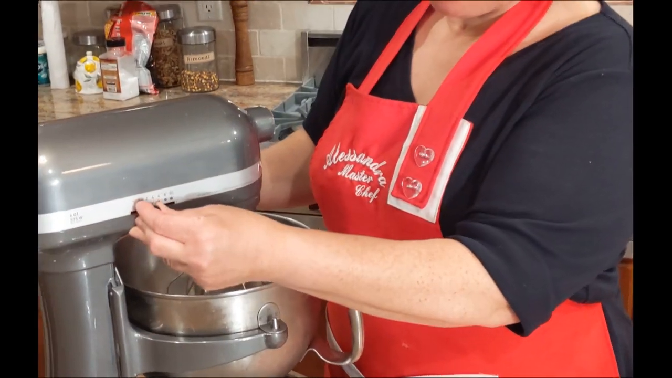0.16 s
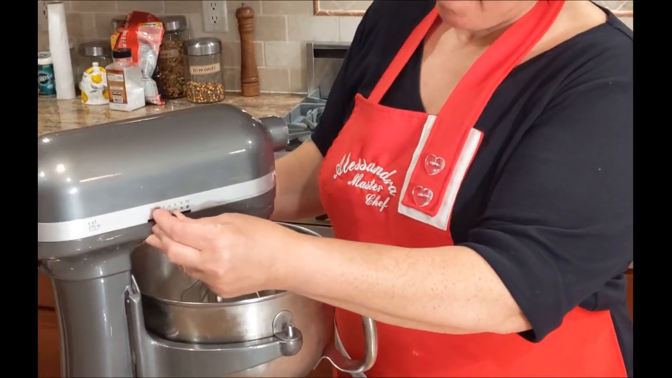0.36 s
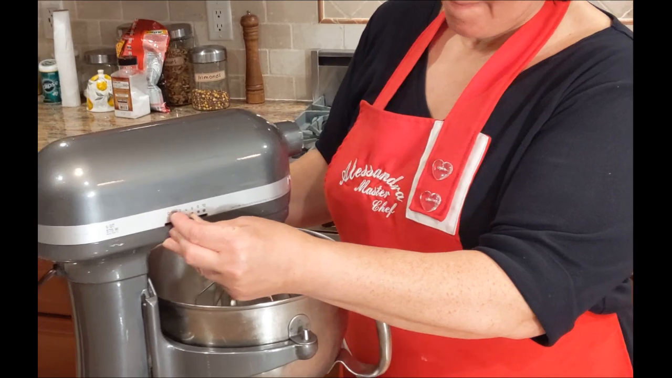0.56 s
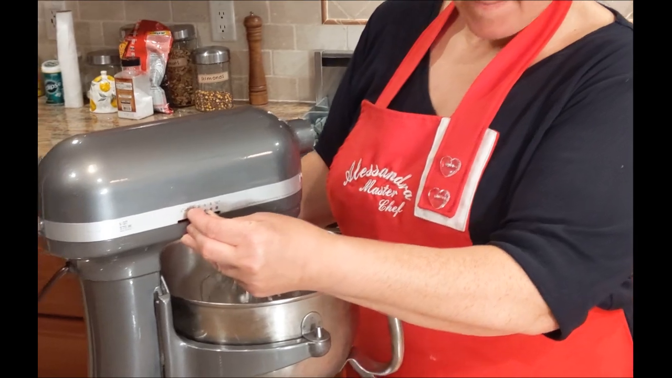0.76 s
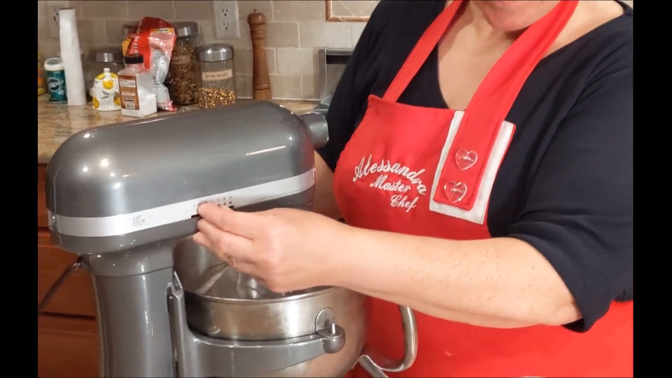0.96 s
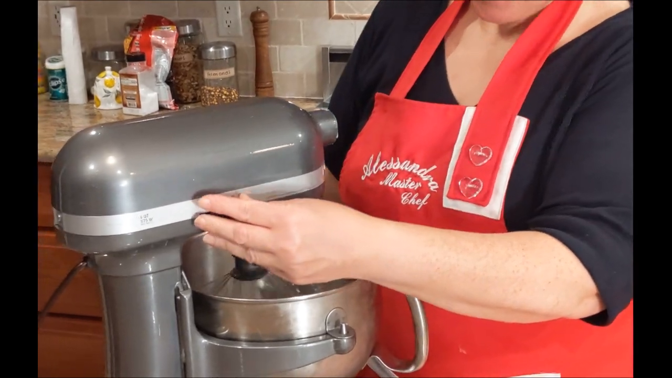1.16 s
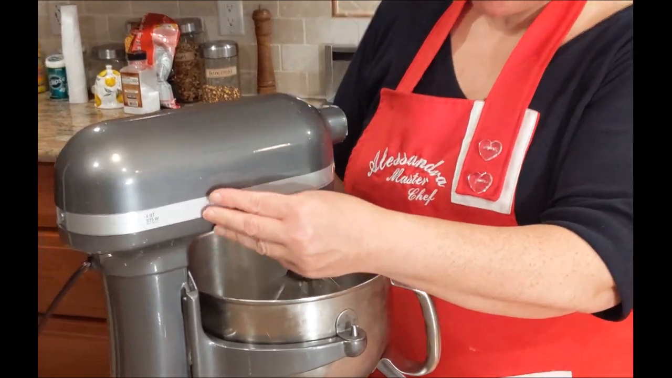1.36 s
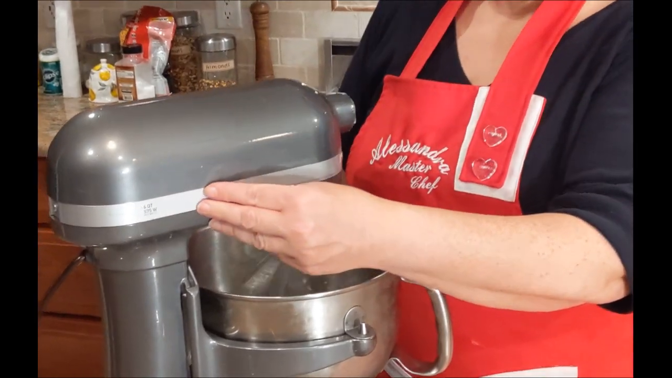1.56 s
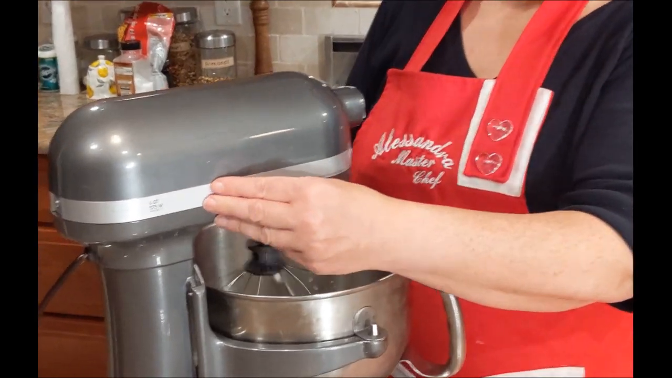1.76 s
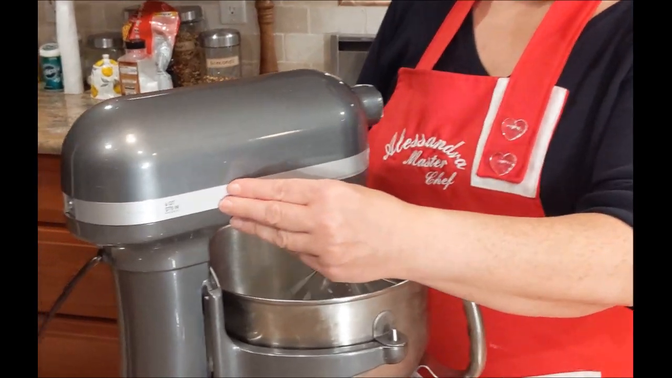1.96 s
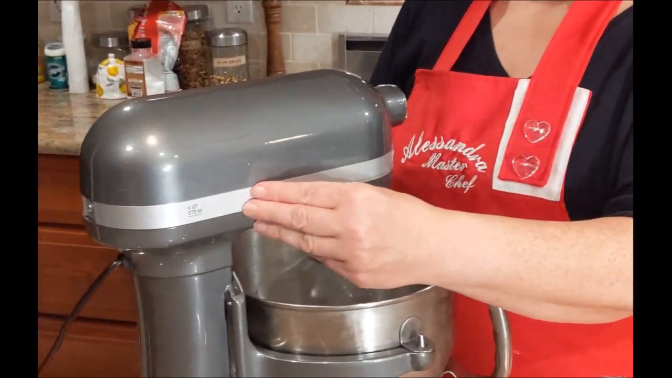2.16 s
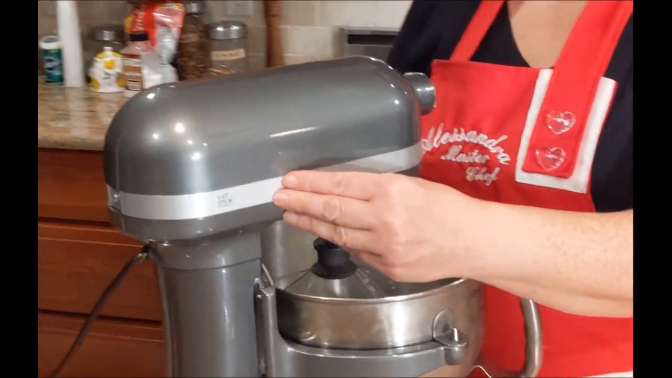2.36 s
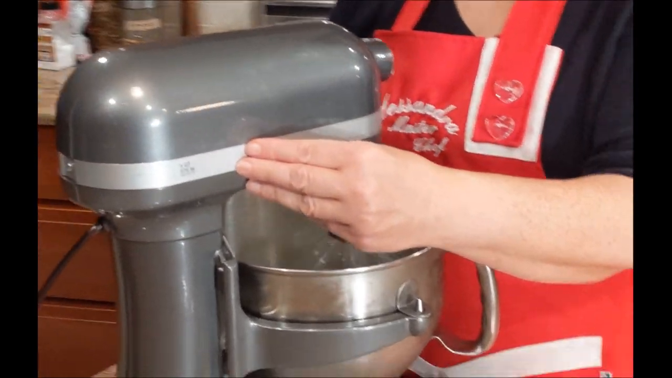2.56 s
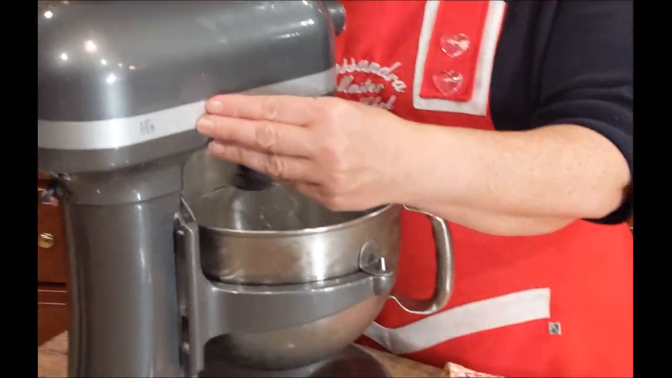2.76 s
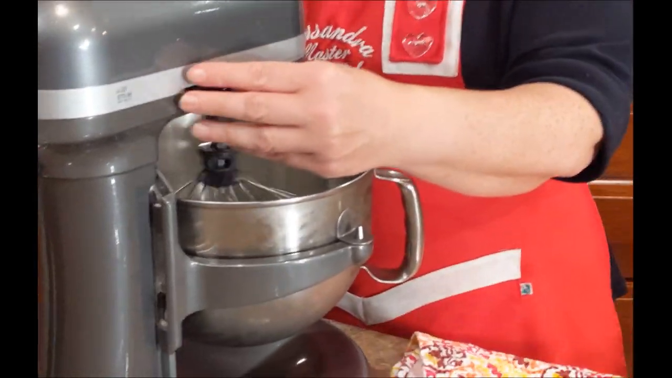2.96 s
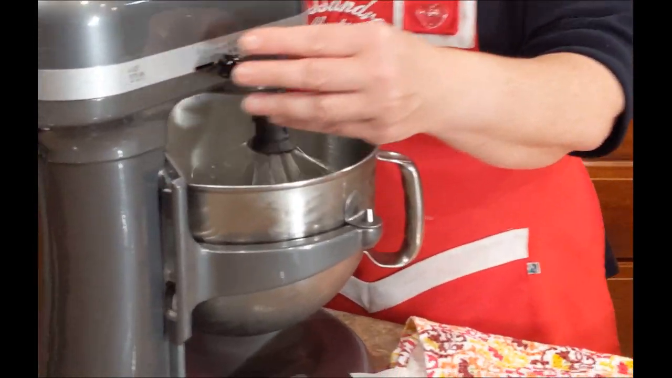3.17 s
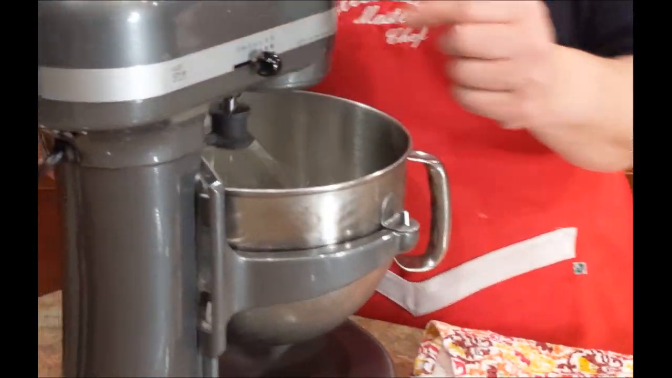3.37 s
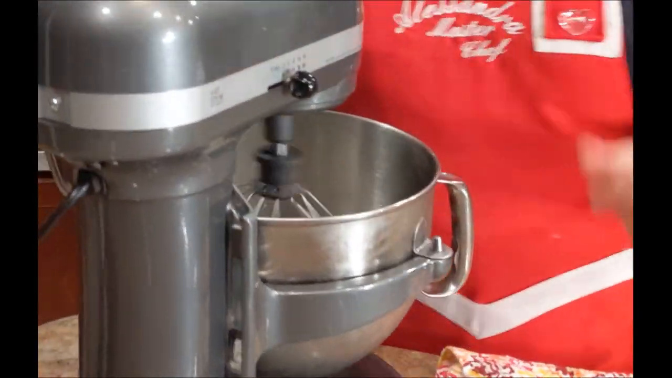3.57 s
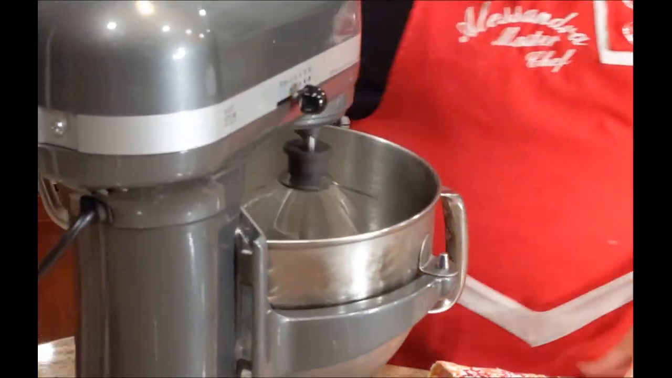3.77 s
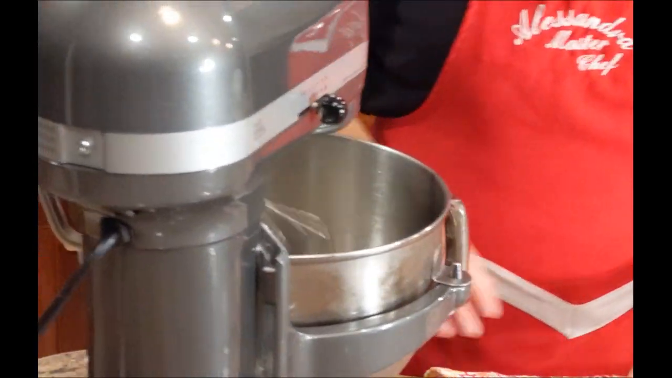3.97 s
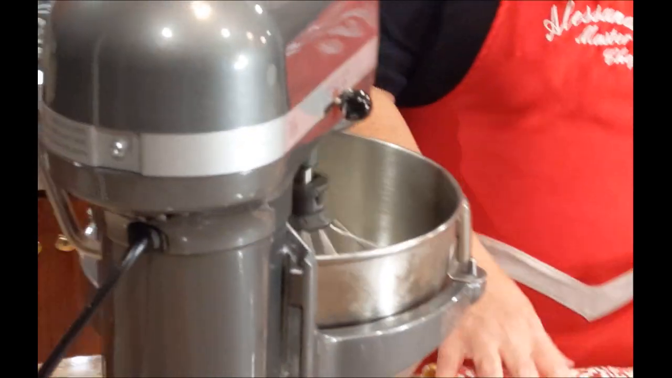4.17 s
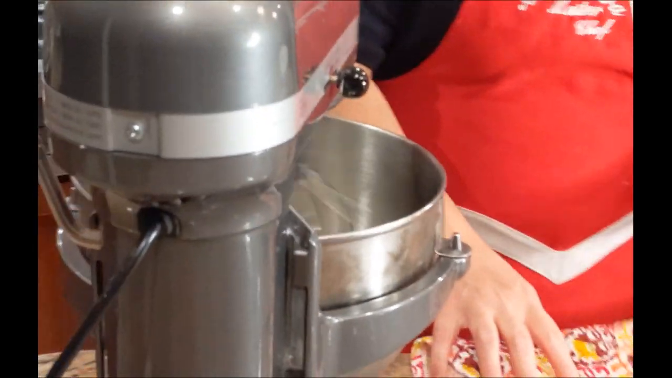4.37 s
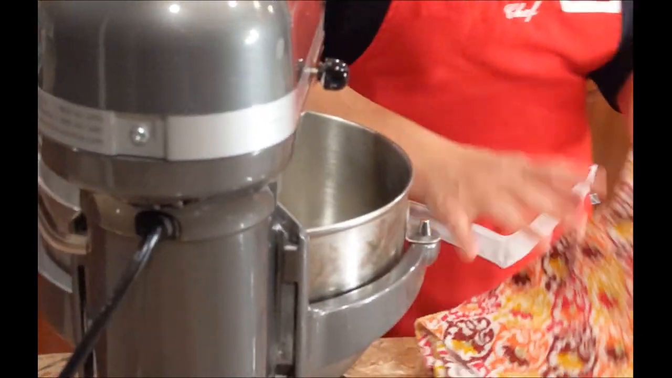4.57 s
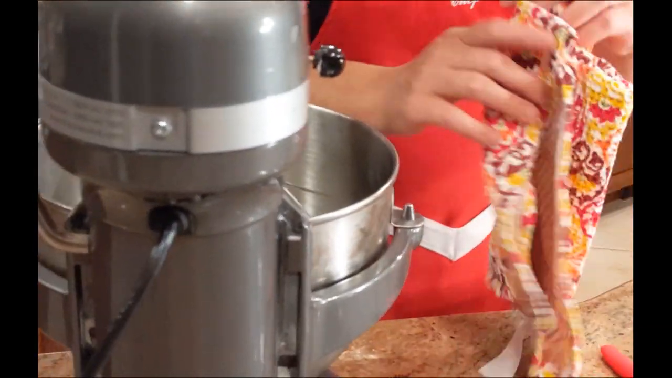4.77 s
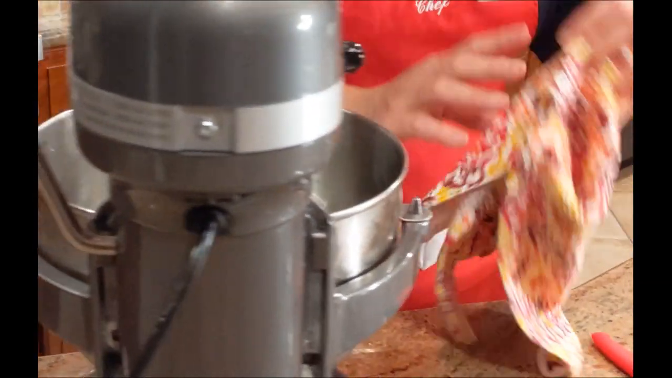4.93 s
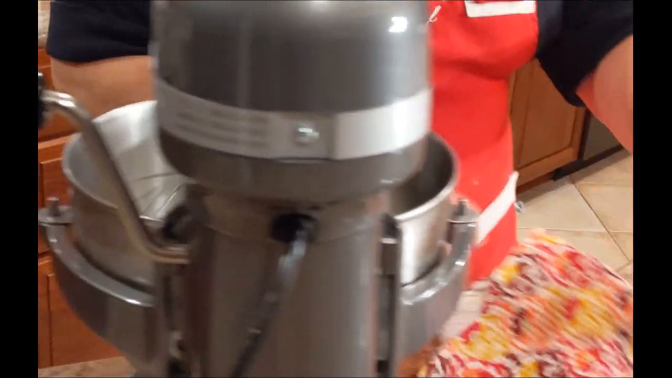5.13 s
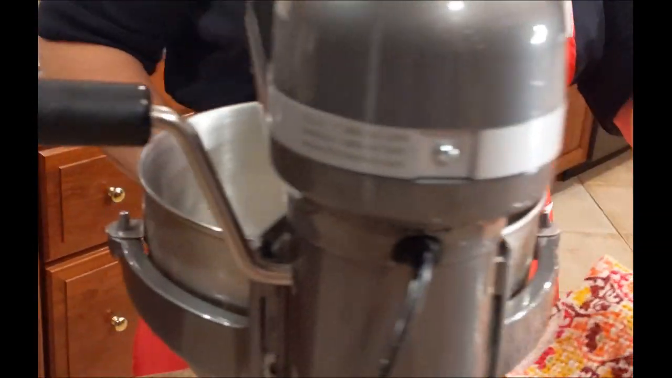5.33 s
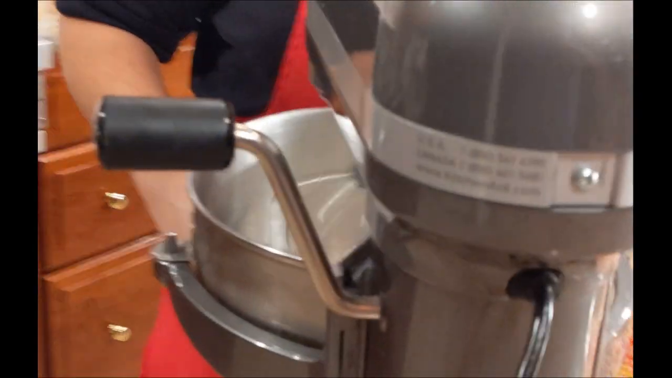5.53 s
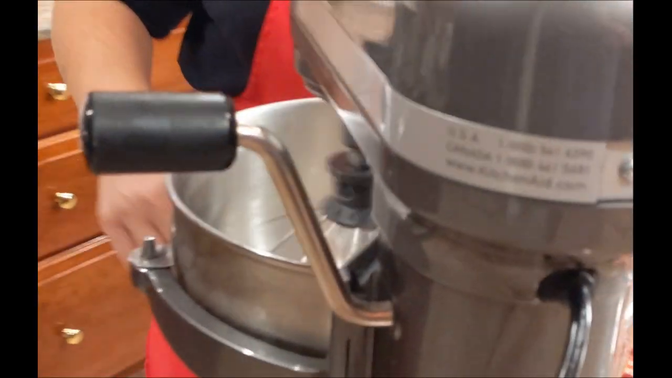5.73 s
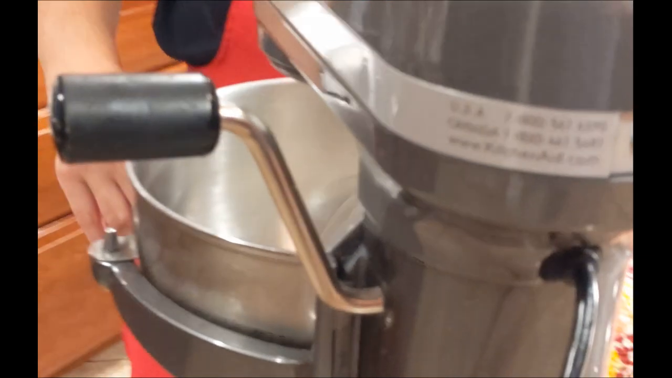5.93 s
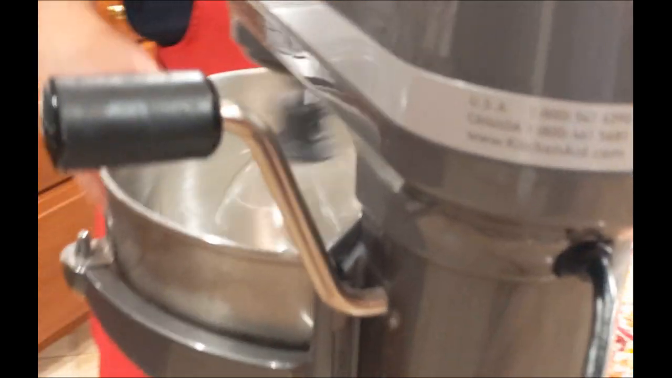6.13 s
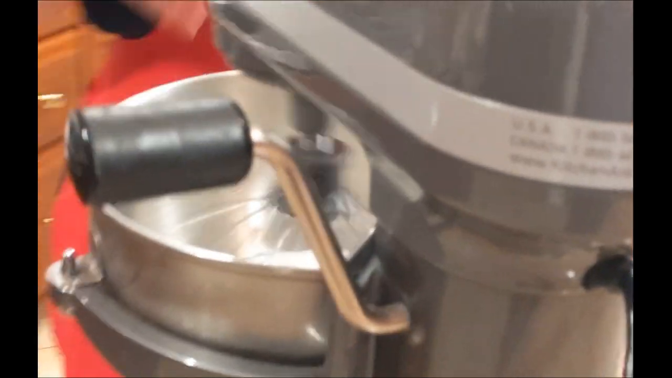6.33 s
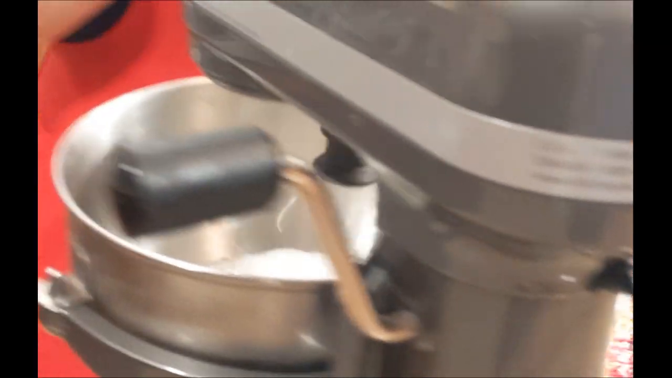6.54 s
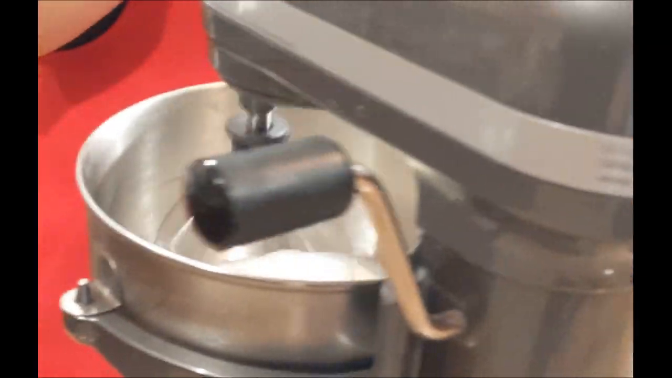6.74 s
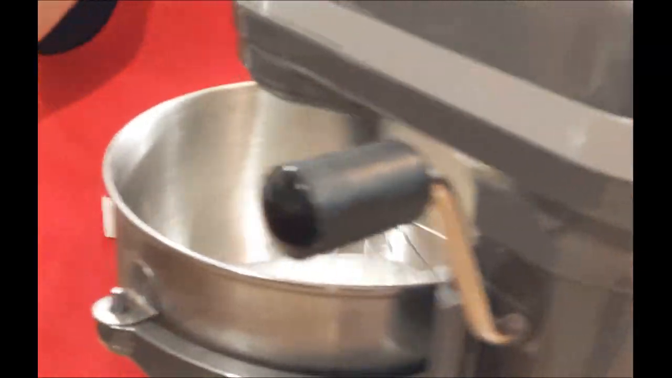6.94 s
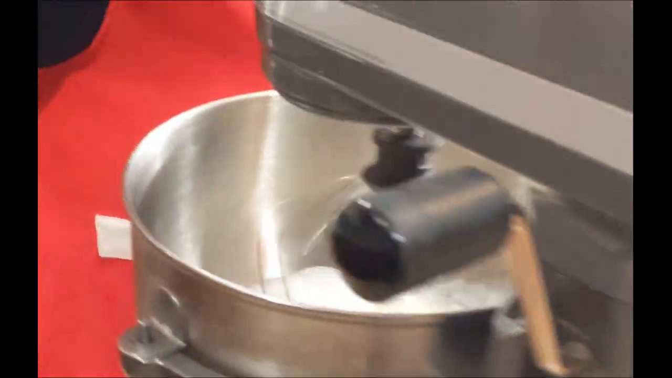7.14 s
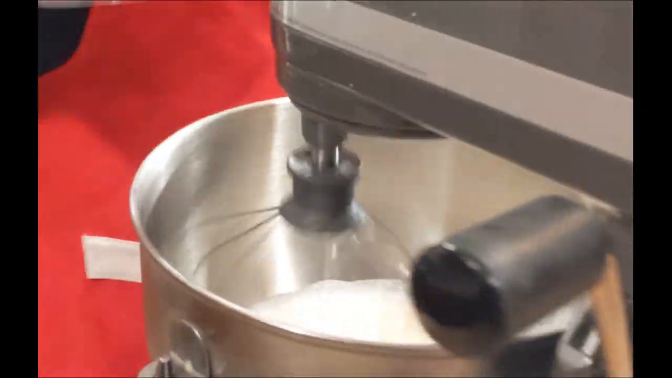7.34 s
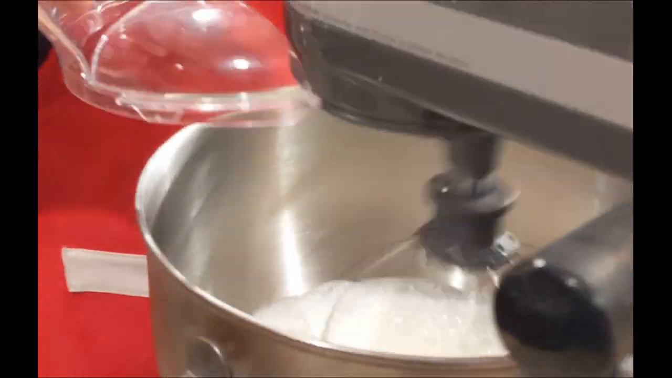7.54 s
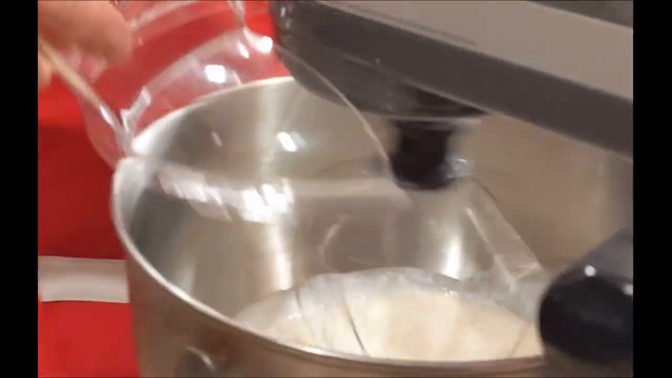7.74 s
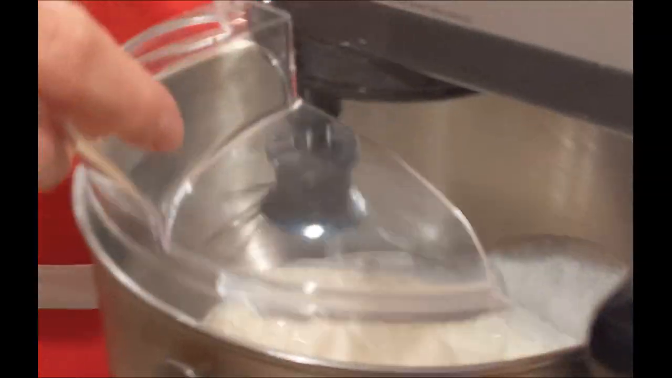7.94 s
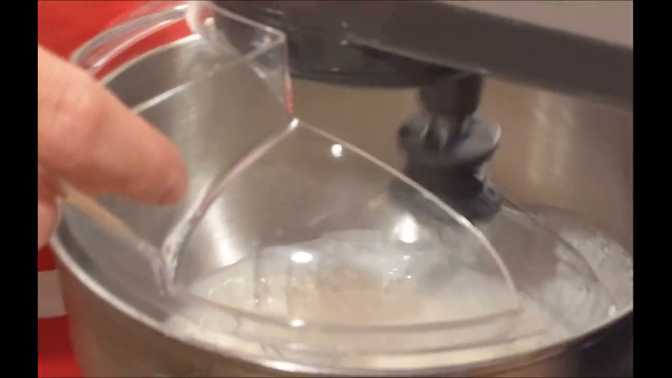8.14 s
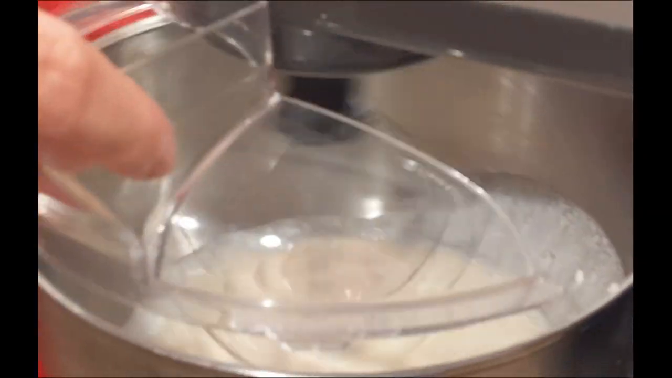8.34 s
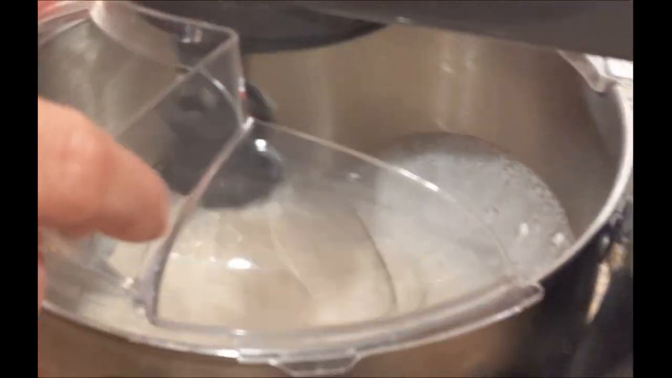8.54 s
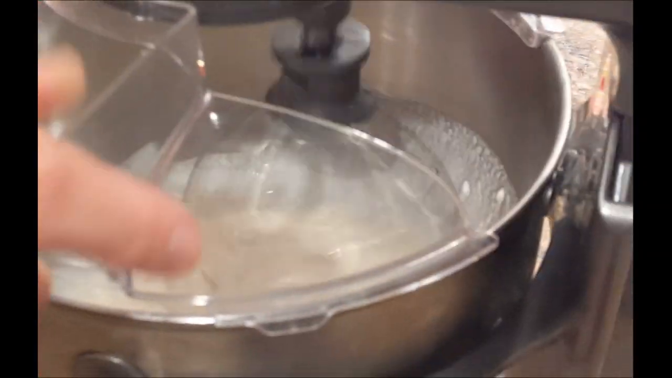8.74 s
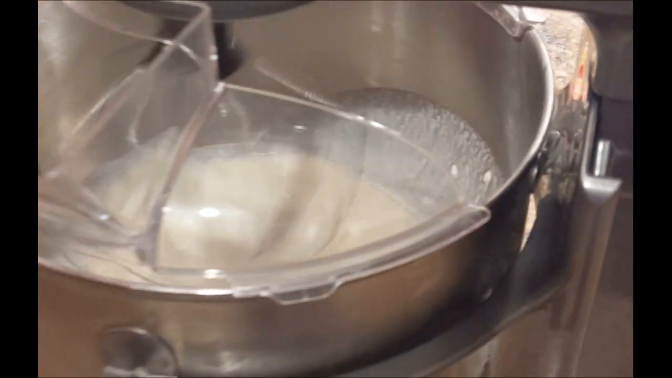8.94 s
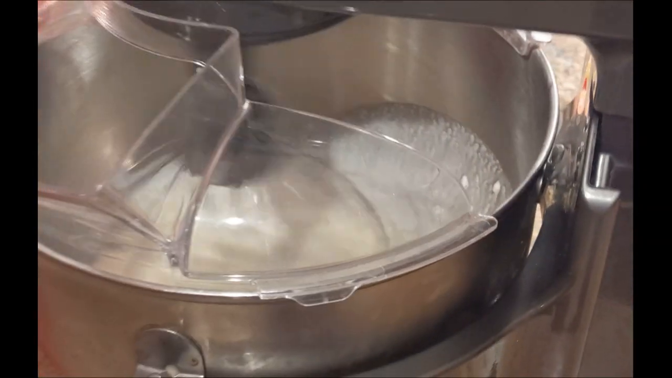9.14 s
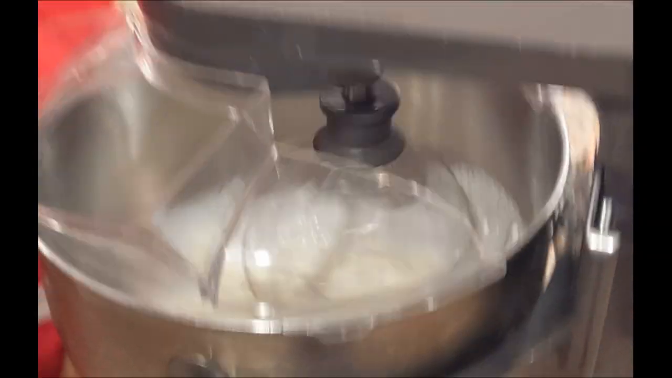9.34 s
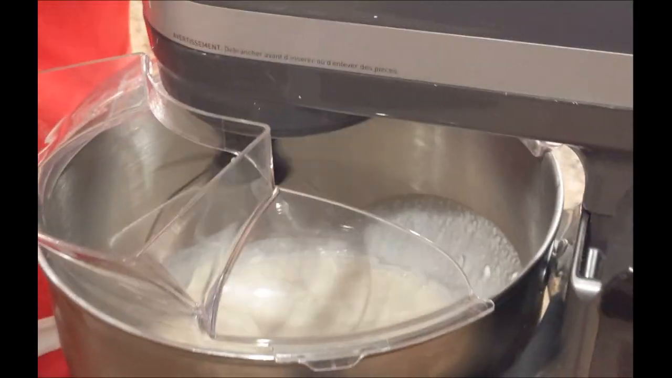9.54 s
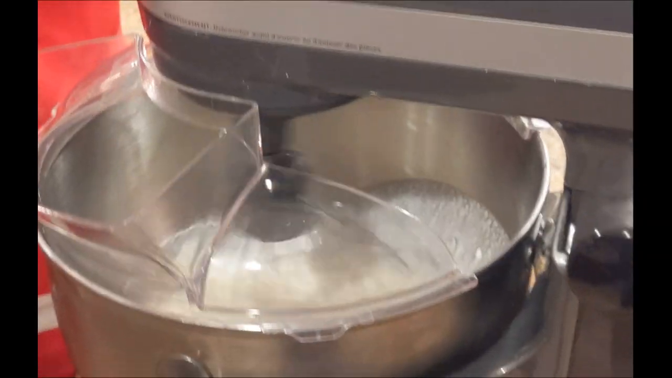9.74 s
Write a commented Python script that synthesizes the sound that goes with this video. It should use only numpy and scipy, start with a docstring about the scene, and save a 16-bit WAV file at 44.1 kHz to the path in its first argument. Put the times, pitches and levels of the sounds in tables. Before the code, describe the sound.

Heard close in stereo, an electric mixer whipping cream goes from near silence to a rough low hum, then quickly up to a constant mid-pitched whine with brush whirr and hiss. Its tones swell and shift as the listener circles and leans in. Plastic clatters brightly against the steel bowl in a brief flurry, followed by two harder clacks and lighter taps, with a short dull kitchen echo. The pitch rises just at the end.

```python
"""A motor starts slowly, is stepped up to a steady gear whine, and speeds up again at the very end:
a stand mixer whips cream in a steel bowl in a home kitchen, heard close by as the listener moves round it.
Sines locked to the shaft make the whine; coloured noise makes the rumble, churn, spatter, whirr and hiss.
A plastic splash guard is knocked onto the rim: filtered noise bursts over decaying bowl modes, with a short room."""
import sys
import numpy as np
from scipy import signal
from scipy.fft import rfft, irfft
from scipy.io import wavfile

SR = 44100
rng = np.random.default_rng(int(sys.argv[2]) if len(sys.argv) > 2 else 0)


def generate_wav(sig):
    """Save sig (samples, or channels by samples) to the path in sys.argv[1] as 16-bit PCM at SR."""
    pcm = np.round(np.clip(np.atleast_2d(sig).T, -1, 1) * 32767).astype(np.int16)
    wavfile.write(sys.argv[1], SR, pcm)


N = 432180
T = np.arange(N) / SR
HZ = np.maximum(np.arange(N // 2 + 1) * SR / N, 1)
LEFT_RIGHT = np.array([[1], [-1]])

# Pushes of the speed lever. Each row: time in seconds, nominal speed asked for in motor turns per second.
LEVER = [(0.47, 82), (0.758, 105), (1.066, 200.65), (9.715, 255)]


def from_db(db):
    """Decibels to gain."""
    return np.exp(np.asarray(db) * (np.log(10) / 20))


def rms_one(x):
    """Scale to unit power."""
    return x / np.sqrt(np.mean(np.abs(x) ** 2) + 1e-20)


def in_time(rows):
    """Each column of a curve at every sample."""
    s, *columns = np.transpose(rows)
    return [np.interp(T, s, c) for c in columns]


def over_hz(points):
    """A table's value at every frequency, interpolated over log frequency."""
    hz, value = np.transpose(points)
    return np.interp(np.log(HZ), np.log(hz), value)


def colour(points):
    """Gain of a spectrum that falls away steeply beyond its ends."""
    outside = np.minimum(1, np.minimum(HZ / points[0][0], points[-1][0] / HZ))
    return from_db(over_hz(points)) * outside ** 4


def drift(corner_hz):
    """Slow random movement of unit rms: noise through two equal lowpass poles, drawn every 40 samples."""
    pole = np.exp(-80 * np.pi * corner_hz / SR)
    noise = rng.standard_normal(N // 40 + 2002)
    slow = signal.lfilter([1], [1, -2 * pole, pole * pole], noise)[2000:]   # skip the filter's onset
    return np.interp(np.arange(N) / 40, np.arange(len(slow)), rms_one(slow))


def stereo(pair, gain):
    """Colour two unrelated signals and mix them into left and right, alike in the bass only."""
    # Likeness of the two microphones. Each row: frequency in Hz, correlation from 0 to 1.
    likeness = [(40, .85), (130, .96), (450, .92), (800, .65), (1300, .35), (2200, 0), (15000, 0)]
    alike = np.clip(over_hz(likeness), -.99, .99)
    mid, side = rfft(pair) * gain
    return irfft(np.sqrt(1 + alike) * mid + np.sqrt(1 - alike) * side * LEFT_RIGHT, N)


def white_pair():
    """Unrelated white noise for two sides."""
    return rng.standard_normal((2, N))


def still_kitchen(floor_db=-57):
    """Quiet room noise, coloured towards the bass, with two steady sines of mains hum."""
    # Tint of the room noise. Each row: frequency in Hz, relative level in dB per Hz.
    floor_tint = [(12, -39), (20, -9), (27, -1), (54, 0.5), (89, -8), (124, 1.5), (147, -7), (263, -6.5),
                  (511, -11.5), (940, -17.5), (15000, -32)]
    # Mains hum. Each row: frequency in Hz, rms level in dB.
    mains = [(60, -84), (120, -67.5)]
    floor = from_db(floor_db) * rms_one(stereo(white_pair(), colour(floor_tint)))
    hum = sum(from_db(db) * np.sqrt(2) * np.sin(2 * np.pi * hz * T) for hz, db in mains)
    return floor + hum


def kitchen_tail(x, wall_hz=4000, t60_s=0.26, size=22050):
    """A short, dull tail from cupboards and tiles: convolution with decaying, lowpassed noise."""
    t = T[:size]
    tail = rng.standard_normal((2, size)) * from_db(-60 * t / t60_s) * (t > .006)   # gap before the tail
    tail = signal.lfilter(*signal.butter(1, wall_hz, fs=SR), tail)
    return signal.fftconvolve(x, rms_one(tail) / np.sqrt(size), axes=1)[:, :N]


def contacts(rebound_s=.006, rebound_db=-4):
    """Every lever click and guard knock, each followed by one softer rebound."""
    # Clicks of the speed lever. Each row: start in seconds, level in dB,
    # body thump in dB relative to the contact, lowpass corner of the contact in Hz.
    lever_clicks = [(.039, -50, -3, 650), (.477, -54, -16, 950)]
    # Knocks of the guard on the rim. Each row: start in seconds, level in dB,
    # body thump in dB relative to the contact, lowpass corner of the contact in Hz.
    guard_knocks = [(7.262, -29, -23, 2000), (7.801, -19.5, -6.5, 2400), (7.819, -19.5, -20, 2100),
                    (7.832, -22.5, -31, 2420), (7.905, -28, -20, 1700), (8.194, -14.5, -34, 1200),
                    (8.412, -14, -15, 4270), (8.767, -31, -20, 3000), (8.998, -33.5, -11, 2200)]
    hits = []
    for s, db, thump_db, bright_hz in lever_clicks + guard_knocks:
        hits.append((s, db, thump_db, bright_hz))
        hits.append((s + rebound_s, db + rebound_db, thump_db, bright_hz))
    return hits


def guard_clack():
    """Noise ringing through the guard's resonances; a thin shell radiates little bass."""
    # Resonances of the plastic guard on the rim. Each row: centre in Hz, width in Hz, relative level in dB.
    guard = [(350, 45, -20), (690, 90, -18.5), (922, 82, 5.5), (1150, 120, -10), (1430, 130, -0.5),
             (1650, 220, -4), (2140, 290, 0.5), (2400, 700, -2), (3600, 1500, -8), (4470, 1200, 1.5),
             (7500, 6800, -21)]
    power = sum(from_db(2 * db) / (1 + (2 * (HZ - hz) / width) ** 2) for hz, width, db in guard)
    radiated = np.sqrt(power) / np.sqrt(1 + (250 / HZ) ** 4)
    return stereo(white_pair(), radiated)


def bowl_ring(t, bright_hz, mode_focus_db=10.0):
    """The steel bowl rings in decaying sine modes; soft, dull blows wake the low ones."""
    # Modes damped by the cream. Each row: frequency in Hz,
    # level in dB relative to the contact before the blow's emphasis, time to fall 60 dB in seconds.
    bowl = [(347, -14, 0.49), (850, -18, 0.06), (971, -3, 0.13), (1215, -13, .14), (1424, -6.5, 0.06),
            (1720, -12, 0.14), (2016, -10, 0.12), (2136, -18.5, 0.17), (2510, -33, .12)]
    ring = 0
    for hz, mode_db, t60_s in bowl:
        lag_s = rng.normal(0, 0.00018, (2, 1))   # each mode reaches the microphones by its own path
        excited_db = mode_db + mode_focus_db * (.8 - abs(np.log2(hz / bright_hz))) + rng.normal(0, 2.1)
        ring = ring + from_db(excited_db - 60 * t / t60_s) * np.sin(2 * np.pi * hz * (t - lag_s))
    return ring


def knocks(rise_s=0.0011, knock_t60_s=0.1, snap_db=-2, snap_t60_s=0.037, size=11025):
    """Each hit is a brief plastic clatter over a dull thump, a ringing bowl and a burst of white snap."""
    # Dull thump of the mixer's body. Each row: frequency in Hz, relative level in dB per Hz.
    thump_tint = [(40, -20), (80, -12), (150, -1), (240, 8), (350, 5.5), (700, -8), (1500, -50)]
    out = np.zeros((2, N + size))
    t = T[:size]
    clack = guard_clack()
    thump = rms_one(stereo(white_pair(), colour(thump_tint)))
    for k, (s, db, thump_db, bright_hz) in enumerate(contacts()):
        at = int(s * SR)
        own = slice(k * size, (k + 1) * size)   # fresh noise for every hit
        contact = rms_one(signal.lfilter(*signal.butter(1, bright_hz, fs=SR), clack[:, own]))
        blow = from_db(-60 * t / knock_t60_s) * (contact + from_db(thump_db) * thump[:, own])
        blow = blow + bowl_ring(t, bright_hz)
        # hard blows snap more
        snap = from_db(1.06 * db + snap_db - 60 * t / snap_t60_s) * rng.standard_normal((2, size))
        out[:, at:at + size] += from_db(db) * (1 - np.exp(-t / rise_s)) * blow + snap
    return out[:, :N]


def motor_speed(kick=62, ramp_share=.62, ramp_s=.12, settle_s=.14):
    """Each push starts a quick straight ramp and a slower settling rise together; the ramp ends first."""
    speed, before = kick, kick   # turns per second
    for s, setting in LEVER:
        since = np.maximum(T - s, 0)
        ramp = ramp_share * np.minimum(since / ramp_s, 1)
        settling = (1 - ramp_share) * (1 - np.exp(-since / settle_s))
        speed = speed + (setting - before) * (ramp + settling)
        before = setting
    return speed


def at_speed(speed):
    """Level of each part of the mixer at the motor's present speed."""
    # The singing tones come forward near cruising speed, where they meet the housing's resonances.
    # Each row: speed in turns per second, then relative levels in dB of housing rumble, churning cream,
    # brush whirr, air hiss, gear tones, motor tones, singing tones.
    effort = [(62, -3, -51, -71, -86, -8, -25, -34), (79.4, -0.5, -51, -50.5, -56, -23, -24, -28),
              (84, 8, -42.5, -43, -51, -9, -13.5, -28), (104, 1, -41.5, -42, -46, -0.5, -5.5, -30),
              (169, 6, -40, -35, -43, 5, 0.5, 2), (200.4, 0.5, -40, -36, -38, 0.5, 0.5, 1),
              (229, 8, -36, -31.5, -36.5, 6, -8, -15)]
    steps, *columns = np.transpose(effort)
    return [np.interp(speed, steps, c) for c in columns]


def nearness():
    """Decibels gained since the listener's starting place."""
    # The listener walks round the mixer and leans over the bowl.
    # Each row: time in seconds, nearness as hiss level in dB (only its change is used).
    hiss_near = [(1.45, -37.0), (2.77, -36.5), (3.61, -34.0), (5.89, -31.5), (8.29, -30.5), (8.53, -31),
                 (9.69, -34)]
    db, = in_time(hiss_near)
    return db - db[0]


def friction(turns, repeat_share, size=440):
    """Rubbing noise, part of which comes round again every two turns of the shaft."""
    share = np.clip(repeat_share, 0, .9)
    track = np.linspace(0, 2, size + 1)
    worn = [np.interp(turns % 2, track, rng.standard_normal(size + 1)) for side in range(2)]
    return np.sqrt(share) * rms_one(np.array(worn)) + np.sqrt(1 - share) * white_pair()


def spatter(per_s, spread_db):
    """Droplets and wire ticks: sparse random impulses of uneven size and either sign."""
    sizes = from_db(spread_db * np.minimum(rng.exponential(1, (2, N)), 4))
    signs = rng.choice([-1, 1], (2, N))
    return rms_one(sizes * signs * (rng.random((2, N)) < per_s / SR))


def counter_echo(x, share=0.26, lag_s=0.000696, sway=0.14):
    """A counter-top reflection; its delay shifts as the listener moves, so bands in the hiss wander."""
    late = T - lag_s * np.exp(sway * drift(0.28))
    echo = np.array([np.interp(late, T, side) for side in x])
    return (x + share * echo) / np.sqrt(1 + share ** 2)


def housing_rumble(turns, effort_db):
    """Low friction noise shaken by the housing, changing with the side that faces the listener."""
    # Each row: frequency in Hz, relative level in dB per Hz.
    rumble_tint = [(50, -11), (120, -11.5), (200, -5), (260, 3), (330, -2), (430, 5), (490, -0.5),
                   (560, -10.5), (640, -2), (760, -17)]
    # Each row: time in seconds, rumble level in dB before the motor's effort is added.
    rumble_level = [(1.5, -49.5), (3.9, -46.5), (7.3, -47), (8.3, -44), (9.1, -50)]
    level_db = effort_db + in_time(rumble_level)[0] + 1.08 * drift(21)
    return from_db(level_db) * rms_one(stereo(friction(turns, 0.033), colour(rumble_tint)))


def cream_churn(turns, level_db, drops):
    """The whisk lashes the cream: mid-band friction noise with droplets in it."""
    # Each row: frequency in Hz, relative level in dB per Hz.
    churn_tint = [(520, -30), (640, -6.5), (810, 4), (920, -2), (1040, 3.5), (1200, -2), (1550, 2.5),
                  (1850, -2), (2050, 1), (2500, -5), (3100, -19.5)]
    return from_db(level_db) * rms_one(stereo(friction(turns, 0.11) + drops, colour(churn_tint)))


def brush_whirr(turns, level_db, drops):
    """Motor brushes rub in the upper mids, under a little of the same spatter."""
    # Each row: frequency in Hz, relative level in dB per Hz.
    whirr_tint = [(2100, -23), (2650, -2), (2900, 0.5), (3300, -2.5), (4000, 1), (4600, 2), (5100, 3.5),
                  (5600, -1), (6300, -8), (7500, -14)]
    return from_db(level_db) * rms_one(stereo(friction(turns, 0.08) + 0.3 * drops, colour(whirr_tint)))


def air_hiss(turns, level_db):
    """Cooling air hisses in the treble, drifts across the stereo image and reflects off the counter."""
    # Each row: frequency in Hz, relative level in dB per Hz.
    hiss_tint = [(5500, -39), (6500, -3), (7500, -3.5), (9000, -4), (10000, -0.5), (10900, 2),
                 (11700, -4.5), (13000, 1.5), (14300, -1), (15700, -5.5)]
    # Each row: time in seconds, added left-minus-right level in dB.
    hiss_pan = [(0, 5), (5.5, -1), (7.2, -1), (9.8, 1)]
    pan_db = in_time(hiss_pan)[0] * LEFT_RIGHT / 2
    gain = from_db(level_db + pan_db + 0.69 * drift(25))
    return counter_echo(gain * rms_one(stereo(friction(turns, 0.12), colour(hiss_tint))))


def mixing(turns, speed, orbit_db=-0.13, lash_db=0.9, brush_db=0.5, turns_per_orbit=72, spatter_db=-5):
    """All the mixer's noise: the whisk's orbit, random lashing and brush pressure sway its levels."""
    rumble_db, churn_db, whirr_db, hiss_db, *_ = at_speed(speed)
    near_db = nearness()   # the hiss gains most from coming close
    orbit = orbit_db * np.sin(2 * np.pi * turns / turns_per_orbit)
    lash = lash_db * drift(17.6)
    brushes = brush_db * np.sin(2 * np.pi * turns)   # contact pressure varies once a turn
    drops = from_db(spatter_db) * spatter(5 * speed, spread_db=1.5)
    rumble = housing_rumble(turns, rumble_db)
    churn = cream_churn(turns, churn_db + 0.61 * near_db + orbit + lash, drops)
    whirr = brush_whirr(turns, whirr_db + 0.49 * near_db + orbit + 0.85 * lash + brushes, drops)
    hiss = air_hiss(turns, hiss_db + near_db + 0.54 * brushes)
    return rumble + churn + whirr + hiss


def labour(noise, speed, full_speed=185):
    """The noise is hollow and resonant until the motor is up to speed (turns per second)."""
    # The housing resonances favoured at low speed. Each row: frequency in Hz, gain in dB.
    labouring = [(170, -8), (250, 0), (320, -7), (430, 6), (600, -5), (780, -1), (970, 4), (1500, -2),
                 (2400, -3), (3000, 0), (4100, 4), (5200, -6.5), (7000, 1), (15000, 0.5)]
    slow = np.clip((full_speed - speed) / 70, 0, 1)
    hollow = irfft(rfft(noise) * from_db(over_hz(labouring)), N)
    return (1 - slow) * noise + slow * hollow


def through(case, orders, speed):
    """Level of each shaft order as it passes the resonances of a casing."""
    hz, db = np.transpose(case)
    return [(order, np.interp(order * speed, hz, db)) for order in orders]


def placed(curve):
    """Level of a whine at the left and right microphone, in dB."""
    db, side_db = in_time(curve)
    sides = from_db(side_db * LEFT_RIGHT / 2)
    return db + 20 * np.log10(sides / np.sqrt(np.mean(sides ** 2, axis=0)))


def tones(turns, family, rough, flutter_hz, wander, governed_hz=200.6, fade_db=0.82, fade_hz=1.6):
    """Lines locked to the shaft; each flutters and reaches the two microphones at a changing phase."""
    out = np.zeros((2, N))
    # the shaft judders away from its governed speed
    cogging = np.clip(abs(np.gradient(turns) * SR - governed_hz) / 25, 0, 1.2)
    depth = rough + 0.16 * cogging
    for order, db in family:
        flutter = drift(flutter_hz)
        # standing waves make each line fade on its own as the listener moves
        size = from_db(db + fade_db * drift(fade_hz)) * np.sqrt(2)
        size = size * (1 + depth * flutter) / np.sqrt(1 + depth ** 2)
        cycles = order * turns + rng.random()
        jitter = (0.86 * rough + cogging) * flutter[::-1]
        phase = 2 * np.pi * (cycles - np.floor(cycles)) + jitter
        apart = wander * (1 + 0.15 * drift(6.8))
        out += size * np.sin(np.float32([phase + apart, phase - apart]))
    return out


def bearing_drone(turns, singing_db):
    """The bearings drone at fractional shaft orders, loudest over the bowl."""
    # Each row: cycles per motor turn, relative level in dB.
    bearing = [(1.2832, -0.5), (1.79, -16), (3.8501, -4), (5.134, 0)]
    # Each row: time in seconds, relative level in dB.
    drone_level = [(1.45, -54.5), (1.93, -52), (7.69, -57.5), (8.41, -44), (9.69, -45.0)]
    gain = from_db(singing_db + 0.3 + in_time(drone_level)[0])
    return gain * tones(turns, bearing, rough=0.21, flutter_hz=13, wander=0.18)


def gear_mesh(turns, speed, gears_db):
    """Gear teeth whine at orders 5, 10 and 15, sweeping through the case's fixed resonances."""
    # Each row: frequency in Hz, relative level in dB.
    gear_case = [(200, -14), (340, -9), (420, 8), (460, 9), (540, -12), (660, 2), (780, -1), (870, -11),
                 (960, 1), (1050, 1), (1130, -8), (1250, -19), (1560, -12), (2000, -21), (3000, -30)]
    # Swells as the microphones pass through standing waves.
    # Each row: time in seconds, relative level in dB, added left-minus-right level in dB.
    mesh_level = [(1.45, -44, -7), (3.01, -38.5, -0.5), (3.61, -43, -13), (3.97, -65, -7.0),
                  (4.09, -45, -12), (4.93, -46.5, -18), (5.05, -55.5, 9.0), (5.29, -46, 7), (6.25, -50, 0),
                  (7.09, -48, -3), (7.33, -35.5, 2), (7.69, -45, 12), (7.81, -36, -0.5), (9.69, -37, 0.5)]
    teeth = through(gear_case, [5, 10, 15], speed)
    gain = from_db(gears_db + 1.5 + placed(mesh_level))
    return gain * tones(turns, teeth, rough=0.2, flutter_hz=12, wander=0.31)


def mesh_sidebands(turns, motor_db):
    """Fainter lines at fractional orders: the bearing tone's second harmonic and lines beside the gear mesh."""
    # Each row: cycles per motor turn, relative level in dB.
    sidebands = [(2.567, -9), (6.2835, -2), (7.567, -1.5), (9.915, -7), (11.39, -13.5)]
    gain = from_db(motor_db - 51 + 1.33 * nearness())
    return gain * tones(turns, sidebands, rough=0.34, flutter_hz=24.0, wander=0.52)


def singing_orders(turns, singing_db):
    """Orders 18 and 24 sing, swelling and fading as the microphones pass their standing waves."""
    # Each row of both: time in seconds, relative level in dB, added left-minus-right level in dB.
    order_18_level = [(1.45, -54, -5), (2.17, -39.5, 3), (2.29, -48.5, -4), (4.81, -53, -7),
                      (5.17, -45, -1.5), (5.41, -55.0, 0.5), (6.13, -49.5, 10), (7.45, -53.5, -3.5),
                      (8.29, -57, 1.0), (8.41, -42, -3), (9.69, -51, -3)]
    order_24_level = [(1.45, -48, 6), (1.57, -42, 9.0), (1.69, -47, 11), (2.41, -53, -3.0),
                      (2.53, -44.5, -17), (3.01, -53, -3), (3.13, -42.5, 9), (3.49, -52.5, -4.5),
                      (3.85, -51.5, -3), (4.09, -53, -3), (5.41, -46.5, -8), (5.53, -57, -7),
                      (6.49, -42.5, 4), (7.09, -48.5, -4.5), (8.17, -36, -6), (8.77, -47, 5),
                      (9.69, -42.5, 2)]
    gain_18 = from_db(singing_db + 4 + placed(order_18_level))
    gain_24 = from_db(singing_db + 7 + placed(order_24_level))
    out = gain_18 * tones(turns, [(18, 3)], rough=0.1, flutter_hz=15.0, wander=1.1)
    return out + gain_24 * tones(turns, [(24, 0)], rough=0.16, flutter_hz=29.1, wander=0.74)


def fan_and_commutator(turns, speed, motor_db):
    """High shaft orders of fan and commutator, shaped by how well the motor housing radiates them."""
    # Each row: frequency in Hz, relative level in dB.
    motor_case = [(1500, -12), (2400, -2), (3000, 7), (3700, 9), (4400, 13), (5000, 5), (5300, 8),
                  (5600, 6), (6050, 1), (7200, -1.5), (7700, -1), (8400, 1.5), (9100, -8), (9650, 1.5),
                  (10850, -1), (13300, 0)]
    slots = through(motor_case, [12, 30, 36, 42, 48, 54, 60, 66], speed)
    gain = from_db(motor_db - 51.5 + 0.68 * nearness())
    return gain * tones(turns, slots, rough=0.38, flutter_hz=24.9, wander=0.86)


def motor_whine(turns, speed):
    """All lines locked to the shaft, each family with its own effort at the present speed."""
    *_, gears_db, motor_db, singing_db = at_speed(speed)
    out = bearing_drone(turns, singing_db)
    out += gear_mesh(turns, speed, gears_db)
    out += mesh_sidebands(turns, motor_db)
    out += singing_orders(turns, singing_db)
    return out + fan_and_commutator(turns, speed, motor_db)


def scene(load_wobble=0.001606, room_db=-14):
    """The mixer runs from the lever's first push; the load of the cream makes its speed waver."""
    speed = motor_speed() * (1 + load_wobble * drift(6.9))
    turns = np.cumsum(speed) / SR
    running = np.clip((T - LEVER[0][0]) / 0.0047, 0, 1)
    mixer = running * (motor_whine(turns, speed) + labour(mixing(turns, speed), speed))
    hits = knocks()
    return still_kitchen() + hits + from_db(room_db) * kitchen_tail(hits) + mixer


def record(dry, cutoff_hz=15850):
    """The two microphones differ in colour; the top is cut."""
    # Each row: frequency in Hz, left-minus-right level in dB.
    tilt = [(100, 2), (600, 0), (1000, -1), (1600, -4.5), (2050, 0), (2600, 4.5), (3000, 5), (4000, 0),
            (5600, 0.5), (7500, 2.5), (9000, 0), (10000, -7), (11700, -9.5), (14000, -15)]
    sides = from_db(over_hz(tilt) * LEFT_RIGHT / 2)
    sides = sides / np.sqrt(np.mean(sides ** 2, axis=0))
    top = 1 / np.sqrt(1 + (HZ / cutoff_hz) ** 400)
    return irfft(rfft(dry) * sides * top, N)


dry = scene()
out = record(dry)
generate_wav(out)
```